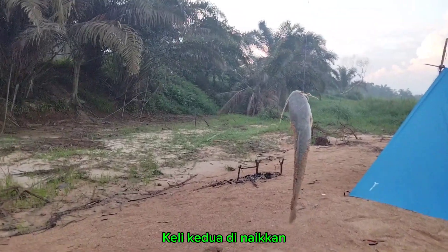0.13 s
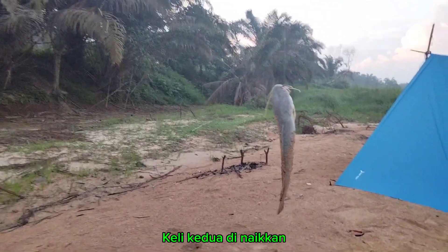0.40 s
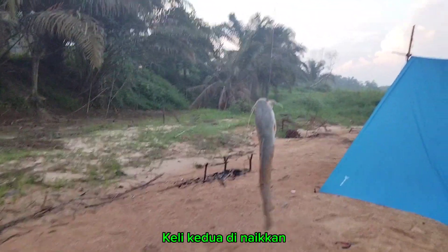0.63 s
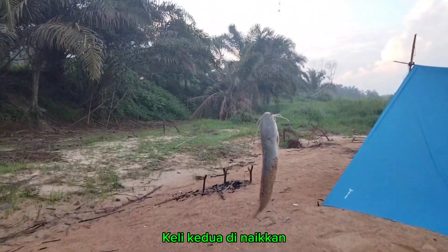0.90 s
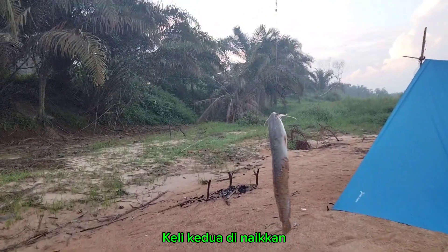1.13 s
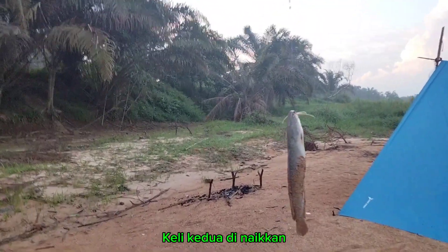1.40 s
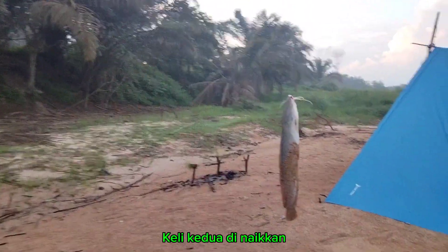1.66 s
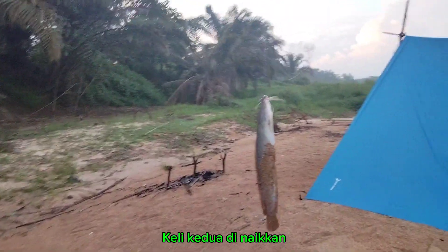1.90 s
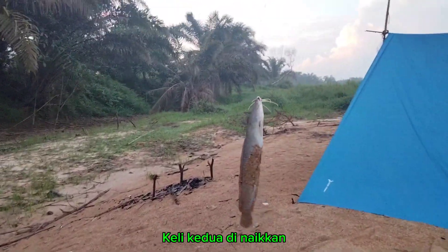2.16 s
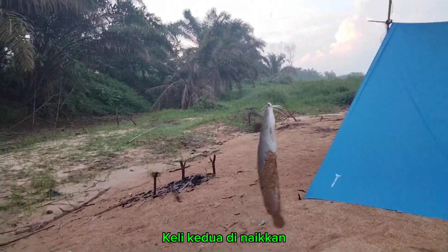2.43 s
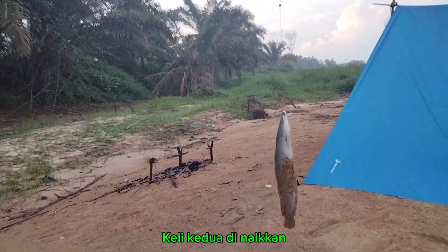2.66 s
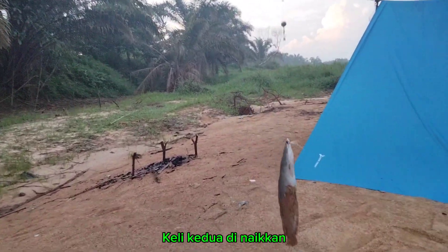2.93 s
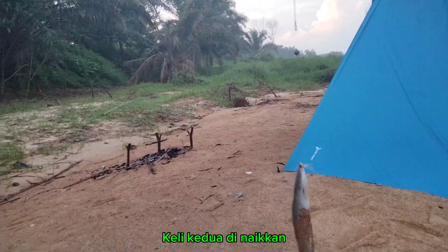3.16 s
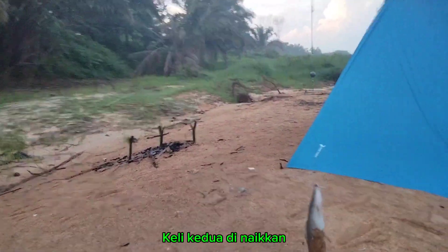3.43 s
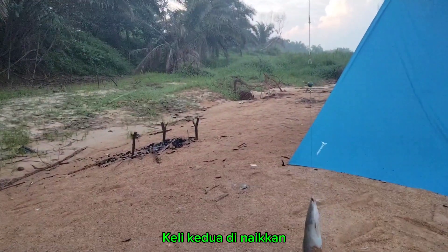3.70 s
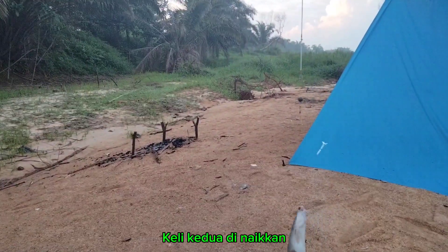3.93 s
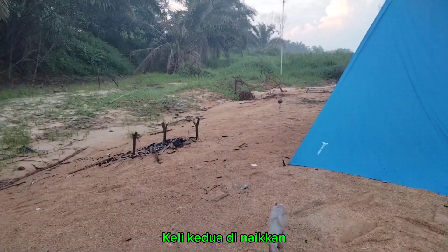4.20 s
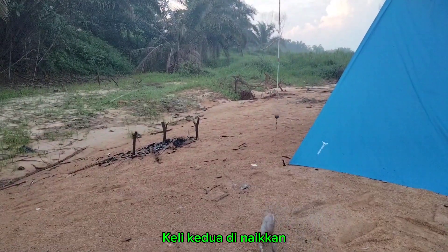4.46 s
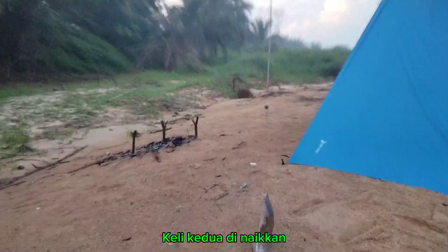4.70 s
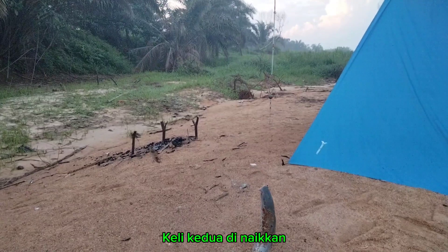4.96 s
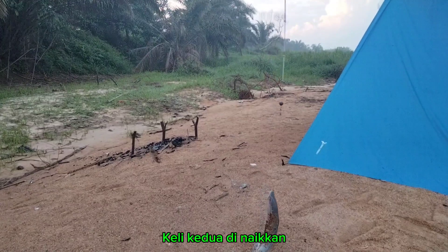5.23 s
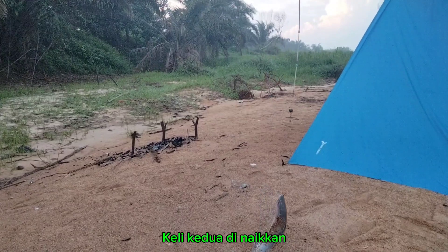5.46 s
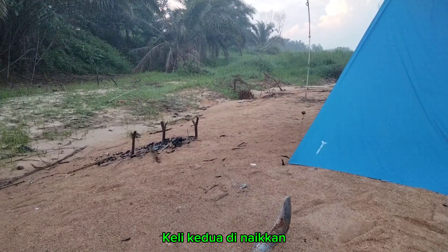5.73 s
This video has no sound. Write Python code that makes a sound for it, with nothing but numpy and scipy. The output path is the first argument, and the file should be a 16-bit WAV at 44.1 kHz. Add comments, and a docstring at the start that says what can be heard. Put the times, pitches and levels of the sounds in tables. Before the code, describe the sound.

Crickets, cicadas and small birds sing over a sandy bank while feet rustle, the handheld phone taps and creaks, and one hard knock lands late.

```python
"""An angler's phone on a sandy river bank: a finger knocks beside the left microphone port and drags
across it, taps ring the case and the grip creaks. Knocks and taps are decaying sines; skin, grip, feet and
a fish's tail on the sand are shaped noise. Around them: far crickets, two nearer crickets chirping in threes
and small birds, all made of gliding tones, a distant dove of two-note songs, and noise for cicadas, low
murmur and rumble."""
import sys
import numpy as np
from scipy import signal
from scipy.io import wavfile
from scipy.ndimage import uniform_filter1d, map_coordinates

SR = 44100
rng = np.random.default_rng(int(sys.argv[2]) if len(sys.argv) > 2 else 0)


def field_ratio(decibels):
    """Amplitude ratio for a level in dB (20 dB per decade); scalars and array-likes work."""
    return 10 ** (np.asarray(decibels, dtype=float) / 20)


def persist_wave(psi):
    """Save psi, clipped to +-1, as 16-bit WAV."""
    counts = np.round(np.clip(psi, -1, 1) * 32767).astype(np.int16)
    wavfile.write(sys.argv[1], SR, np.atleast_2d(counts).T)


N = 257984
T = np.arange(N) / SR

# Low murmur of the bank. Each row: frequency in Hz, relative density in dB per Hz.
AIR_SPECTRUM = [(18, 5), (30, -8), (88, 4), (445, -19.5), (560, -13), (1540, -24), (1730, -21), (2180, -19),
                (2600, -13), (2900, -64), (3770, -64), (6380, -120)]
# Low rumble that swells and fades. Each row: peak in seconds, rise in seconds, hold in seconds, level in dB.
RUMBLE_SWELLS = [(.98, 0.83, 0.23, -54), (1.3, 0.11, 0.48, -63.5), (4.05, .06, .11, -58),
                 (5.295, 0.016, .02, -62)]
# Rumble colour. Each row: frequency in Hz, relative density in dB per Hz.
RUMBLE_SPECTRUM = [(100, -9), (180, -2), (300, -4.5), (420, -31)]
# Cicada hiss. Each row: frequency in Hz, relative density in dB per Hz.
CICADA_SPECTRUM = [(2500, -58), (3300, 1.5), (3900, -43), (4250, -8.5), (4800, -28), (5400, -8.5),
                   (5800, -26.5), (6100, -9), (6400, -13.5), (7100, -4), (7900, -10.5), (10400, -6),
                   (11000, -11), (11500, -25.5), (13000, -18.5), (14200, -28), (14500, -51)]
# Far crowd of low crickets. Each row: time in seconds, level in dB.
LOW_CHORUS_LEVEL = [(0.0, -56.5), (0.47, -53.5), (0.99, -55.5), (1.4, -51), (2.13, -61.5), (2.57, -49.5),
                    (3.0, -52), (3.94, -54.5), (4.2, -52), (4.58, -54.5), (5.85, -54.5)]
# A nearer low cricket. Each row: peak in seconds, rise in seconds, hold in seconds, level in dB.
SOLO_SWELLS = [(0.0, .3, 0.58, -51.5), (1.42, 0.32, 0.4, -54), (2.55, 0.27, 0.47, -62.5),
               (4.2, 0.55, 0.086, -57.5), (5.2, 0.9, .2, -55)]
# Near crickets, a bout of even phrases a row. Each row: start in seconds, number of phrases,
# phrase spacing in seconds, level in dB, left-right difference in dB.
CRICKET_BOUTS = [(-.0358, 4, .1995, -51.5, 46), (.7963, 1, 0.17, -51, 15), (1.373, 4, 0.23, -50, 3),
                 (2.3358, 1, .2, -41.5, 2), (4.4685, 7, .199, -51, 36), (5.238, 3, 0.23, -47, 0)]
# Dove songs. Each row: start in seconds, level in dB.
DOVE_SONGS = [(2.585, -61.5), (5.075, -61)]
# Notes of a dove song, a short arch and a long fall. Each row: delay in seconds, length in seconds,
# start in Hz, top in Hz, end in Hz, relative level in dB.
DOVE_NOTES = [(0, .145, 600, 680, 640, 0), (.39, .35, 670, 690, 570, -1.5)]
# Small birds. Each row: start in seconds, length in seconds, start in Hz, end in Hz, mean level in dB.
BIRD_WHISTLES = [(0.083, 0.048, 2176, 1940, -57), (0.882, 0.37, 973, 1080, -65),
                 (1.253, 0.2, 1103, 1020, -67), (1.39, 0.04, 1110, 1080, -61),
                 (1.493, 0.029, 1020, 1030, -60), (2.352, 0.043, 1766, 1760, -62.5),
                 (2.593, 0.0058, 1920, 1860, -46), (2.66, 0.025, 1880, 1960, -54),
                 (2.697, 0.27, 1048, 1106, -69.5), (2.725, .06, 2540, 2650, -58),
                 (2.717, 0.054, 1230, 1310, -61.5), (2.798, 0.013, 1990, 1940, -49.5),
                 (2.925, 0.13, 1800, 1790, -56), (3.2, 0.23, 1830, 1760, -66),
                 (3.231, 0.021, 1880, 1770, -54), (3.315, 0.024, 1794, 1720, -54.5),
                 (4.129, 0.026, 1750, 1780, -58), (4.144, 0.017, 2000, 1970, -57),
                 (4.526, 0.015, 2100, 2100, -58.5), (4.65, 0.03, 2210, 1925, -52),
                 (5.02, 0.022, 2300, 1990, -56.5), (5.18, 0.042, 1780, 1810, -58.5),
                 (5.562, 0.019, 1886, 2170, -50), (5.68, 0.03, 2025, 1750, -55),
                 (5.799, 0.023, 2040, 2170, -59)]
# Feet and cloth on sand. Each row: peak in seconds, rise in seconds, hold in seconds,
# grit level in dB, dull level in dB.
SHUFFLE_SWELLS = [(.12, 0.24, .005, -63, -68), (.19, 0.084, 0.019, -52.5, -53.5),
                  (.41, 0.16, 0.017, -61, -60), (.49, 0.18, 0.22, -52.5, -60),
                  (1.02, 0.056, .02, -56, -60.5), (1.09, 0.11, 0.07, -52.5, -61.5),
                  (1.24, 0.092, .03, -60.5, -61), (1.285, 0.06, 0.026, -56.5, -54),
                  (1.62, 0.38, 0.01, -63, -64.5), (1.737, 0.011, 0.055, -48.5, -78),
                  (1.9, 1, 0.19, -54.5, -65), (2.69, 1, 0.15, -54.5, -86), (3.1, 0.099, 0.12, -57.5, -61.5),
                  (3.225, 0.025, 0.28, -58.5, -63.5), (3.53, 0.012, 0.68, -55.5, -73),
                  (4.1, 0.2, 0.085, -55.5, -64), (4.22, .05, 0.21, -56.5, -62.5),
                  (4.96, 0.16, 0.45, -71, -59.5), (5.43, 0.27, 0.037, -70, -58),
                  (5.645, .02, 0.0098, -56, -59), (5.8, 0.95, 0.045, -53, -75)]
# Gritty part of the shuffle. Each row: frequency in Hz, relative density in dB per Hz.
GRIT_SPECTRUM = [(500, -19), (1100, -7), (1500, -3), (1900, 0), (2400, -4), (2900, -8), (3900, -16),
                 (4700, -14), (6000, -22), (13000, -40), (14500, -60)]
# Dull part of the shuffle. Each row: frequency in Hz, relative density in dB per Hz.
DULL_SPECTRUM = [(250, -14), (500, -7), (800, -5.5), (1200, -8), (2000, -81)]
# Tail sweeps. Each row: peak in seconds, rise in seconds, hold in seconds, level in dB.
TAIL_SWELLS = [(3.035, 0.06, 0.018, -46.5), (5.347, 0.0061, 0.011, -38), (5.371, 0.019, 0.0025, -39.5)]
# Wet grains. Each row: frequency in Hz, relative density in dB per Hz.
WET_SAND_SPECTRUM = [(180, -45), (300, -18), (507, -10), (985, -9), (1150, -8), (1260, -5.5), (1500, -7.5),
                     (2160, -12.5), (2600, -10.5), (5900, -25.5), (6780, -32), (12000, -35), (15600, -68),
                     (22000, -120)]
# The hand creeps on the case. Each row: peak in seconds, rise in seconds, hold in seconds, level in dB.
GRIP_SWELLS = [(3.04, 0.019, .005, -33), (3.29, 0.3, 0.0038, -56.5), (3.446, 0.051, 0.01, -42),
               (3.555, 0.022, .001, -41.5), (3.587, .005, 0.088, -46.5), (3.69, .005, 0.13, -54),
               (4.04, 0.067, 0.029, -61), (4.2, 0.012, 0.035, -50.5), (4.24, 0.022, .01, -52.5),
               (4.32, 0.06, 0.016, -50.5), (4.366, 0.01, 0.018, -47), (4.823, .002, .001, -41),
               (4.935, 0.12, 0.0018, -49), (5.532, 0.11, 0.012, -56.5)]
# Creaking case. Each row: frequency in Hz, relative density in dB per Hz.
CREAK_SPECTRUM = [(70, -28), (130, -5), (260, -14), (400, 0), (540, -2), (850, -35.5)]
# Taps on the case. Each row: start in seconds, level in dB, hardness in dB per octave,
# relative crack level in dB, left-right difference of the ring in dB.
CASE_TAPS = [(1.177, -39, -1, -11, 8), (3.032, -29.5, 3.5, -10, 3), (3.562, -23, 4.5, -4.5, 5),
             (3.617, -36.5, 1.5, -8, -2), (3.65, -38, 6.5, 0.5, -5.5), (3.694, -33.5, 5, -19, 11.5),
             (3.761, -46.5, 6, -6, 7), (3.885, -36, -1.5, -11, 6.5), (4.017, -35.5, 0.5, -11, 1.5),
             (4.368, -38, -4, -12, 3), (4.948, -51, -34, -26, 27)]
# Case resonances. Each row: nominal frequency in Hz, left gain in dB, right gain in dB, T60 in seconds.
CASE_RESONANCES = [(216, -12, -6, 0.023), (363.4, -0.5, -45, 0.032), (535, 1, 1.5, 0.025),
                   (1158, -14.5, -22, 0.02), (2100, -35, -3.5, 0.013)]
# Skin across the port. Each row: peak in seconds, rise in seconds, hold in seconds, mean level in dB.
DRAG_SWELLS = [(4.845, 0.064, .028, -42.5), (4.868, 0.016, 0.0034, -33.5), (4.9, 0.011, 0.006, -44.5),
               (4.912, .02, 0.0094, -55)]
# Dragging skin. Each row: frequency in Hz, relative density in dB per Hz.
SKIN_SPECTRUM = [(300, -12), (600, 0.5), (1500, 2), (3200, 4.5), (4800, 4), (6800, -5), (9000, -15),
                 (12500, -9), (15000, -18), (16000, -60)]
# Short clicks and thumps of the finger and case. Each row: start in seconds, level in dB,
# frequency in Hz, T60 in seconds, left-right difference in dB.
CLICKS_AND_THUMPS = [(3.031, -26.5, 144, 0.041, 13), (4.8126, -24.5, 5600, 0.0023, 20),
                     (4.8125, -16, 9800, 0.0011, 22), (4.8126, -23, 14000, .0015, 22),
                     (3.4, -38, 110, .07, -15), (4.8318, -30.5, 570, 0.048, -4),
                     (4.8736, -14, 620, 0.0034, 20), (4.8745, -10.5, 170, 0.01, 32),
                     (4.894, -20, 450, 0.01, 25), (4.891, -29, 530, 0.067, -15),
                     (4.902, -35, 1830, 0.014, -15), (4.816, -35, 450, .015, -15),
                     (4.89, -42, 2300, .01, -14), (4.908, -37, 580, 0.04, -12), (4.943, -45, 570, .05, -16)]
# Ringing of the hard knock. Each row: frequency in Hz, level in dB, T60 in seconds.
HARD_KNOCK_MODES = [(396, -5, 0.0076), (710, -10, 0.01), (1480, -23.5, 0.0047), (2570, -31, 0.0065)]


def unit(x):
    """Scale to rms 1."""
    return x / np.sqrt(np.mean(x ** 2) + 1e-20)


def along(points, hz):
    """Interpolate (Hz, value) points on a log axis."""
    f, v = np.transpose(points)
    return np.interp(np.log(hz + 1), np.log(f + 1), v)


def sides(pan_db):
    """Left and right gains whose mean is 1."""
    left = field_ratio(np.asarray(pan_db))
    return 2 * np.array([left, np.ones_like(left)]) / (1 + left)


def wobble(knots_per_s):
    """Smooth random curve through normally distributed knots."""
    knots = rng.standard_normal(int(N * knots_per_s / SR) + 4)
    return map_coordinates(knots, [T * knots_per_s])


def swells(rows, sag_db_per_s, release_db_per_s):
    """Gain of events that climb 20 dB per rise time, sag while held, then let go; one per level column."""
    power = 0
    for peak_s, rise_s, hold_s, *db in rows:
        t = T - peak_s
        climb_db = 20 * np.minimum(t, 0) / rise_s
        sag_db = sag_db_per_s * np.clip(t, 0, hold_s)
        release_db = release_db_per_s * np.maximum(t - hold_s, 0)
        power = power + (field_ratio(db)[:, None] * field_ratio(climb_db - sag_db - release_db)) ** 2
    return np.sqrt(power)


def rush(spectrum, alike, patchy_db, grain_db=0.):
    """Stereo noise of rms 1 in patches of random gain; alike is (Hz, left-right correlation)."""
    # random gain on single samples makes crackle
    noise = rng.standard_normal((2, N)) * field_ratio(grain_db * rng.standard_normal((2, N)))
    hz, _, z = signal.stft(noise, SR, nperseg=1024)
    field = uniform_filter1d(rng.standard_normal(z.shape[1:]), size=8, axis=0)
    field = uniform_filter1d(field, size=5, axis=1)
    z = z * field_ratio(along(spectrum, hz)[:, None] + patchy_db * unit(field))
    turn = np.arccos(np.clip(along(alike, hz), -1, 1))[:, None] / 2
    mid, side = np.cos(turn) * z[0], np.sin(turn) * z[1]
    pair = np.array([mid + side, mid - side])
    return unit(signal.istft(pair, SR, nperseg=1024)[1][:, :N])


def glides(s, life_s, from_hz, to_hz, gains):
    """Soft-edged gliding tones, one per start time; gains is (channels, tones)."""
    s, life_s, from_hz, to_hz = (np.broadcast_to(v, np.shape(s))[:, None] for v in (s, life_s, from_hz, to_hz))
    k = np.arange(int(life_s.max() * SR) + 1)
    u = np.minimum(k / SR / life_s, 1)
    cycles = life_s * u * (from_hz + (to_hz - from_hz) * u / 2)
    tone = np.sin(np.pi * u) ** 0.77 * np.sin(2 * np.pi * cycles)
    at = np.clip((s * SR).astype(int) + k, 0, N).ravel()
    return np.array([np.bincount(at, (g[:, None] * tone).ravel(), N + 1)[:N] for g in gains])


def far(x, t60_s, wet_db):
    """The trees scatter a sound back as a decaying noise tail, differently to each port."""
    t = np.arange(SR // 2) / SR
    tail = rng.standard_normal((2, len(t))) * field_ratio(-60 * t / t60_s)
    tail = tail / np.linalg.norm(tail[0])
    return x + field_ratio(wet_db) * signal.fftconvolve(x, tail, axes=1)[:, :N]


def air():
    """Low murmur: noise whose level drifts slowly."""
    noise = rush(AIR_SPECTRUM, [(60, 0.91), (290, 0.7), (700, 0.034)], patchy_db=1.5)
    return field_ratio(-58 + 3 * wobble(0.82)) * noise * sides(-1.2)[:, None]


def rumble():
    """Low noise that swells and fades, nearly alike on both sides."""
    noise = rush(RUMBLE_SPECTRUM, [(200, 0.92)], patchy_db=2.0)
    return swells(RUMBLE_SWELLS, sag_db_per_s=12, release_db_per_s=270) * noise * sides(-0.87)[:, None]


def cicadas():
    """Steady hiss: high-pitched noise, almost unrelated left and right."""
    return field_ratio(-54.5) * rush(CICADA_SPECTRUM, [(5000, .02)], patchy_db=0.94)


def chorus(from_hz, to_hz, life_s, spread, rest, singers):
    """Crickets scraping falling strokes about 26 times a second, each resting in a rhythm of its own."""
    rate, start, pitch, phrase = rng.standard_normal((singers, 4)).T[:, :, None]
    late, sharp, strong = rng.standard_normal((3, singers, 170))
    s = (np.arange(170) + 2 * start - 8) / (26 * (1 + .03 * rate)) + .001 * late
    sings = np.sin(2 * np.pi * (3 + .8 * phrase) * s + 5 * start) > 2 * rest - 1
    gains = sings * field_ratio(2 * strong + 3.7 * rng.standard_normal((2, singers, 1)))
    pitch = (1 + spread * pitch + 0.0094 * sharp).ravel()
    lag_s = rng.uniform(0, .003, (2, singers, 1))  # each singer reaches the two ports by its own paths
    ports = []
    for lag, gain in zip(lag_s, gains):
        port = glides((s + lag).ravel(), life_s, from_hz * pitch, to_hz * pitch, [gain.ravel()])
        ports.append(unit(port))
    return np.vstack(ports)


def far_crickets():
    """A low crowd, a nearer low singer that swells, and a high crowd, each scattered by the trees."""
    low = unit(far(chorus(3620, 3125, 0.0225, 0.0121, .05, singers=12), 0.12, -10))
    solo = unit(far(chorus(3790, 3380, 0.02, 0.002, .01, singers=1), 0.15, -9))
    high = unit(far(chorus(5450, 4434, 0.02766, 0.0219, 0.07, singers=24), 0.064, 1.3))
    low_db = np.interp(T, *np.transpose(LOW_CHORUS_LEVEL))
    solo_gain = swells(SOLO_SWELLS, sag_db_per_s=9.2, release_db_per_s=8)
    return field_ratio(low_db) * low + solo_gain * solo + field_ratio(-62.0) * high


def near_crickets():
    """Phrases of three falling strokes that swell, the first phrase of a bout weaker."""
    stroke_spacing_s, warm_up_db = .039, -4
    strokes = []
    for start_s, phrases, spacing_s, db, pan_db in CRICKET_BOUTS:
        for p in range(round(phrases)):
            for k, swell_db in enumerate((-6.5, -3, -2)):
                s = start_s + spacing_s * p + stroke_spacing_s * k
                strokes.append((s, db + swell_db + warm_up_db * (p == 0), pan_db))
    s, db, pan_db = np.transpose(strokes)
    gains = (s > 0) * field_ratio(db + 1.9 * rng.standard_normal(len(s))) * sides(pan_db)
    near = glides(s, 0.0237, 5350, 4455, gains)
    return far(near * field_ratio(2 * wobble(300)), .15, -6)


def dove():
    """Slightly wavering two-note songs; pitch and level peak early in each note."""
    top_share, fade_db = .35, 5  # share of a note at its peak; level lost towards its ends
    out = np.zeros((2, N))
    for start_s, song_db in DOVE_SONGS:
        for delay_s, life_s, from_hz, top_hz, to_hz, note_db in DOVE_NOTES:
            u = (T - start_s - delay_s) / life_s
            rising = u < top_share
            off = np.where(rising, 1 - u / top_share, (u - top_share) / (1 - top_share))
            off = np.clip(off, 0, 1) ** 1.54  # 0 at the peak, 1 at the ends
            hz = top_hz + off * (np.where(rising, from_hz, to_hz) - top_hz) + 10 * wobble(70)
            edges = np.clip(np.minimum(u, 1 - u) * life_s / 0.005, 0, 1)
            gain = field_ratio(song_db + note_db - fade_db * off + 1.5 * wobble(40))
            out += gain * edges * np.sin(2 * np.pi * np.cumsum(hz) / SR)
    return out


def small_birds():
    """Short gliding whistles of unsteady level."""
    s, life_s, from_hz, to_hz, db = np.transpose(BIRD_WHISTLES)
    return glides(s, life_s, from_hz, to_hz, [field_ratio(db), field_ratio(db)]) * field_ratio(2.5 * wobble(80))


def birds():
    """Dove and small birds, scattered by the trees."""
    return far(dove() + small_birds(), 0.19, -2)


def shuffle():
    """Feet and cloth: crackling grit and a duller rustle that never stops."""
    gritty, muffled = swells(SHUFFLE_SWELLS, sag_db_per_s=28, release_db_per_s=295)
    grit = rush(GRIT_SPECTRUM, [(1400, .65), (4000, .2)], patchy_db=2.5, grain_db=6)
    dull = rush(DULL_SPECTRUM, [(700, .7)], patchy_db=2.5, grain_db=5)
    crunch = field_ratio(0.3 * wobble(30) + 1.2 * wobble(70))  # grains give way in uneven bunches
    rustle = np.hypot(muffled, field_ratio(-75.5)) * dull
    return crunch * (gritty * grit + rustle) * sides(-2.0)[:, None]


def fish():
    """Sweeps of the tail throw wet grains: crackling noise."""
    grains = rush(WET_SAND_SPECTRUM, [(1300, .8), (4000, .4)], patchy_db=1, grain_db=7)
    return swells(TAIL_SWELLS, sag_db_per_s=30, release_db_per_s=510) * sides(-2.1)[:, None] * grains


def grip():
    """The hand creeps on the case, pushing one port as it pulls the other: partly opposed noise."""
    creak = rush(CREAK_SPECTRUM, [(300, -.3)], patchy_db=3, grain_db=9)
    return swells(GRIP_SWELLS, sag_db_per_s=31, release_db_per_s=325) * sides(5.8)[:, None] * creak


def taps():
    """Each tap cracks and rings the case, which bends one port in and the other out."""
    out, t = np.zeros((2, N + SR)), np.arange(SR // 10) / SR
    hz, left_db, right_db, t60_s = np.transpose(CASE_RESONANCES)[:, :, None]
    band = signal.butter(1, [1300, 7000], "bandpass", fs=SR)
    for s, db, hardness_db, crack_db, pan_db in CASE_TAPS:
        scatter = 1 + 0.073 * rng.standard_normal(hz.shape)
        modes = field_ratio(hardness_db * np.log2(hz / 400) - 60 * t / t60_s) * np.sin(2 * np.pi * hz * scatter * t)
        ring = np.array([np.sum(field_ratio(left_db) * modes, 0), -np.sum(field_ratio(right_db) * modes, 0)])
        ring = ring * (1 - np.exp(-(t / 0.0043) ** 2))
        crack = signal.lfilter(*band, rng.standard_normal((2, len(t))))
        decay = field_ratio(-24.5 - 60 * t / 0.0067) + field_ratio(2.0 - 60 * t / 0.053)  # fast and slow parts
        crack = crack * field_ratio(crack_db) * decay
        tap = field_ratio(12.5) * ring * sides(pan_db)[:, None] + crack * sides(-2.0)[:, None]
        out[:, round(s * SR):][:, :len(t)] += field_ratio(db) * tap
    return out[:, :N]


def drag():
    """Skin drags across the left port: crackling noise of fast uneven level."""
    skin = rush(SKIN_SPECTRUM, [(3000, .3)], patchy_db=1.5, grain_db=6)
    gain = swells(DRAG_SWELLS, sag_db_per_s=30, release_db_per_s=6200) * field_ratio(1.5 * wobble(300))
    return gain * sides(22)[:, None] * skin


def knocks():
    """Decaying sines with a negative first swing: a blow sucks the membrane outward first."""
    # clicks and thumps build up over a third of a cycle; in the hard knock a fingertip takes a moment to flatten
    short = [(*row, .3 / row[2]) for row in CLICKS_AND_THUMPS]
    hard = [(4.8087, db, hz, t60_s, 33, .00012) for hz, db, t60_s in HARD_KNOCK_MODES]
    out = np.zeros((2, N))
    for s, db, hz, t60_s, pan_db, rise_s in short + hard:
        t = np.maximum(T - s, 0)
        soft = 1 - np.exp(-t / rise_s)
        out -= field_ratio(db - 60 * t / t60_s) * soft * np.sin(2 * np.pi * hz * t) * sides(pan_db)[:, None]
    return out


def scene():
    """Sum of the bank, its animals and the handled phone."""
    bank = air() + rumble() + cicadas() + far_crickets() + near_crickets() + birds()
    return bank + shuffle() + fish() + grip() + taps() + drag() + knocks()


def roll_off(x):
    """The treble ends steeply here."""
    return signal.sosfilt(signal.butter(12, 15510, fs=SR, output="sos"), x)


def record(dry):
    """The microphones pass neither the deepest bass nor the top treble."""
    low_cut = signal.butter(2, 48, "highpass", fs=SR, output="sos")
    top_cut = signal.butter(10, 14400, "lowpass", fs=SR, output="sos")
    mix = signal.sosfilt(np.vstack([low_cut, top_cut]), dry)
    return roll_off(mix)


dry = scene()
out = record(dry)
persist_wave(out)
```